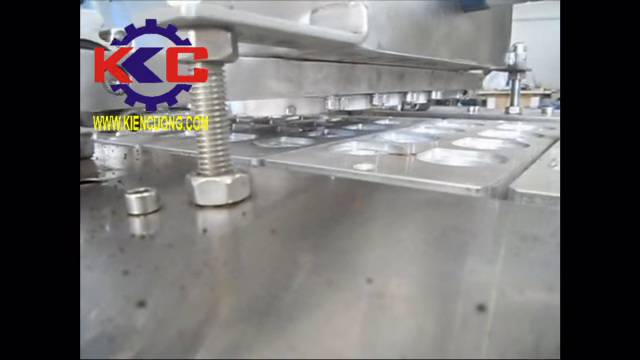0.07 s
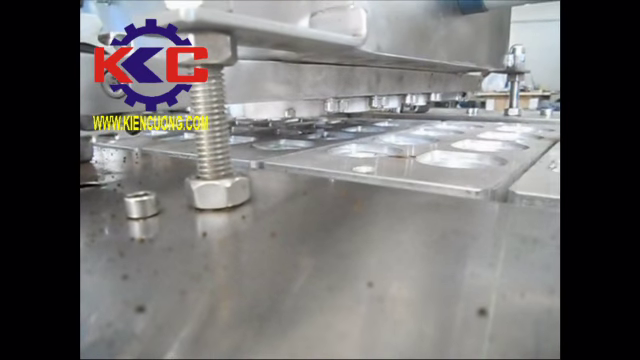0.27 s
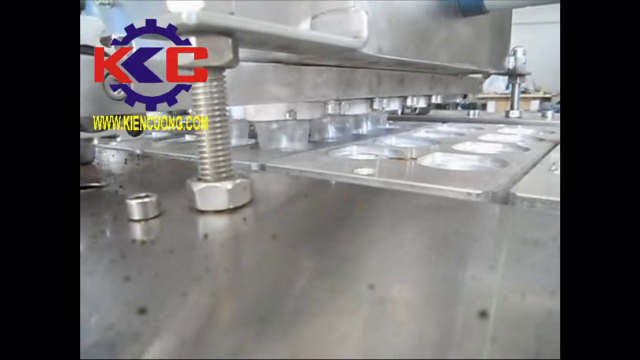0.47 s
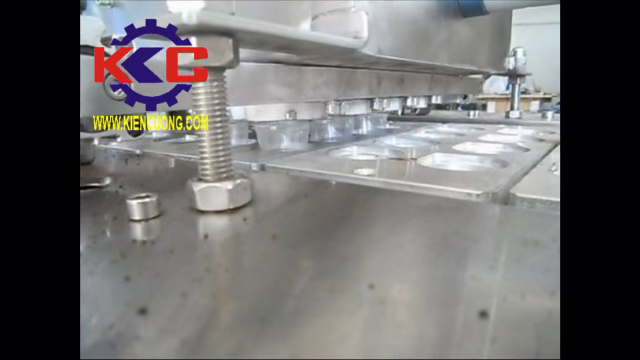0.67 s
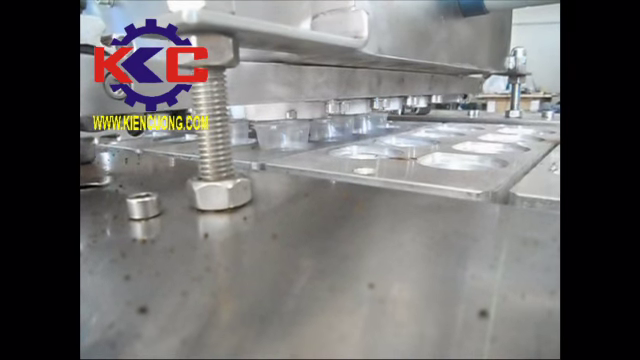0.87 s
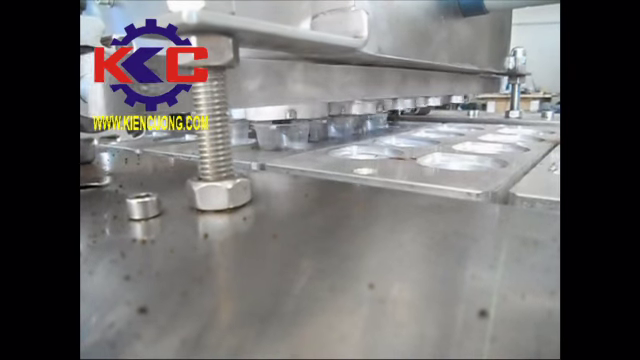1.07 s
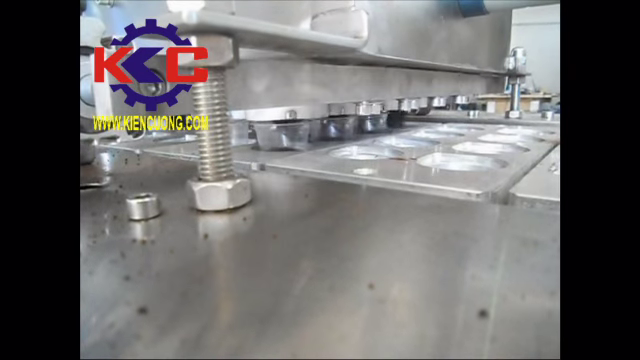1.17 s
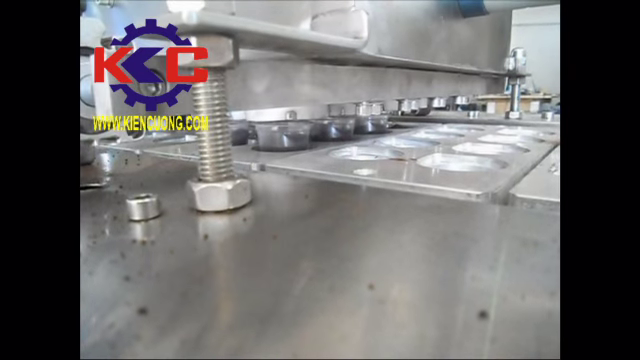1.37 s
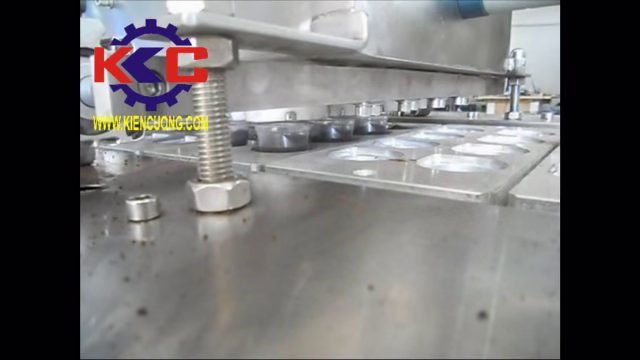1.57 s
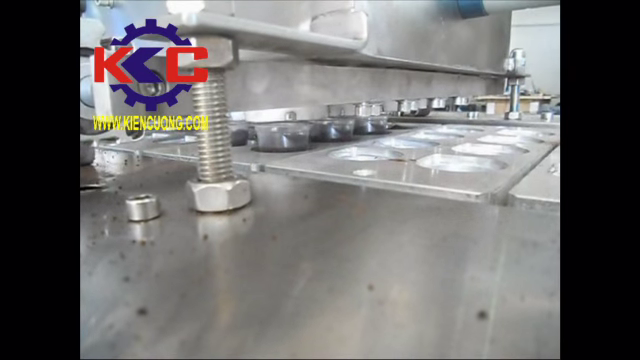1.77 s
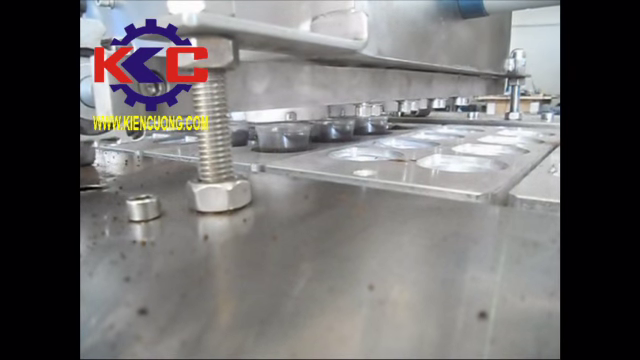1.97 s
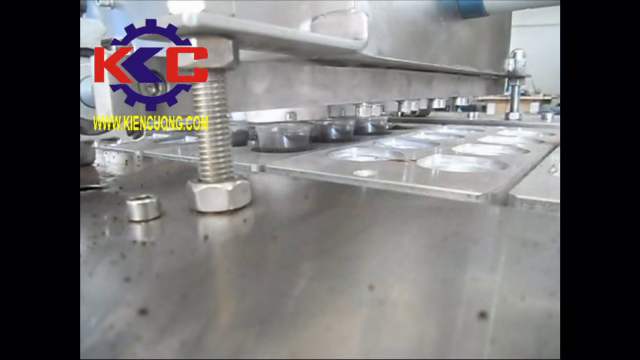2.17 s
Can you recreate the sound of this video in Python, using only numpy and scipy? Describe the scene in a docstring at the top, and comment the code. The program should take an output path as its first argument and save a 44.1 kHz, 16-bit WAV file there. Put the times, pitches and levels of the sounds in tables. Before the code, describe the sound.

A pneumatic cup filling machine cycles with air hisses, metal knocks, clicks and a clank.

```python
"""A workshop, at the steel table of a pneumatic cup filling machine that runs through one cycle.
The carriage slides with grainy friction and knocks the frame into ringing; latch pins click home.
Air rushes and whistles thinly through the cylinder, the press thuds down and a steel stop clanks.
Air valves hiss in turn over the drone of the shop."""
import sys
import numpy as np
from scipy import signal
from scipy.fft import rfft, irfft
from scipy.io import wavfile
from scipy.ndimage import uniform_filter1d

SR = 44100
rng = np.random.default_rng(int(sys.argv[2]) if len(sys.argv) > 2 else 0)


def int16_out(signal):
    """Quantize to a 16-bit WAV file."""
    q = np.round(np.clip(np.atleast_2d(signal).T, -1, 1) * 32767)
    wavfile.write(sys.argv[1], SR, q.astype(np.int16))


N = 97020
T = np.arange(N) / SR


def undb(db):
    """Decibels to gain."""
    return 10 ** (np.asarray(db) / 20)


def curve(rows, col=1):
    """One column of a time table, linearly interpolated."""
    rows = np.array(rows)
    return np.interp(T, rows[:, 0], rows[:, col])


def colour(x, points):
    """Minimum-phase filter from (f/Hz, gain/dB) points; attacks stay sharp."""
    hz, db = np.array(points).T
    bins_hz = np.arange(N + 1) * SR / (2 * N)
    gain = undb(np.interp(np.log(bins_hz + 1), np.log(hz), db))
    cepstrum = irfft(np.log(gain))
    cepstrum[1:N] *= 2
    cepstrum[N + 1:] = 0
    return irfft(rfft(x, 2 * N) * np.exp(rfft(cepstrum)))[:N]


def noise(spectrum, grain_db=0):
    """Coloured noise, rms 1; grain makes it a crowd of tiny uneven impacts."""
    size = np.minimum(rng.exponential(size=N), 4.5)
    x = colour(rng.standard_normal(N) * undb(grain_db * size), spectrum)
    return x / x.std()


def drift(rate_hz):
    """Smooth random signal, spread near 1."""
    step = max(int(SR / rate_hz), 1)
    held = rng.standard_normal(N)[np.arange(N) // step]
    return 1.3 * uniform_filter1d(uniform_filter1d(held, step), step)


def fade(t60_s):
    """Exponential decay."""
    return np.exp(-np.log(1000) * T / max(t60_s, 1e-3))


def at(x, start_s):
    """Delay x to start_s."""
    return np.concatenate([np.zeros(int(start_s * SR)), x])[:N]


def ring(modes, contact_s=0.00021):
    """Decaying modes of a struck part, built up over the contact."""
    build = 1 - np.exp(-T / contact_s)
    return build * sum((-1) ** k * undb(db) * fade(t60_s) * np.sin(2 * np.pi * hz * T)
                       for k, (hz, db, t60_s) in enumerate(modes))


def strike(blows, modes, spectrum, crack_db, crack_t60_s, room_db, room_t60_s, rattle_db=1.5):
    """A heavy part lands and bounces: unevenly rattling modes, short crack, diffuse tail."""
    body = ring(modes)
    envelope = undb(crack_db) * fade(crack_t60_s) + undb(room_db) * fade(room_t60_s)
    out = 0
    for start_s, db in blows:
        rattle = undb(rattle_db * (2 - fade(room_t60_s)) * drift(90))
        out += undb(db) * at(body * rattle + envelope * noise(spectrum), start_s)
    return out


PRESS_LANDINGS = [(1.612, -7.2), (1.618, -13), (1.632, -22)]  # landing and rebounds [t/s, level/dB]
PRESS_MODES = [(160, -17, 0.13), (223, -8.5, 0.18), (278, -10.5, 0.11), (805, -3.5, 0.065),
               (916, -8, 0.064), (1096, -12.5, 0.29), (1237, -4, 0.13)]  # resonances [f/Hz, level/dB, t60/s]
PRESS_SPECTRUM = [(70, -16), (200, 17), (420, -11.5), (950, 9), (1600, -3), (2600, -10), (4200, -22),
                  (9000, -29), (14000, -95)]  # impact noise [f/Hz, level/dB]


def press():
    """The press thuds down and rebounds twice."""
    return strike(PRESS_LANDINGS, PRESS_MODES, PRESS_SPECTRUM,
                  crack_db=-5.5, crack_t60_s=0.063, room_db=-10.5, room_t60_s=0.35)


STOP_HITS = [(1.789, -13.5), (1.7927, -33.5)]  # blow and bounce [t/s, level/dB]
STOP_MODES = [(230.6, -5, 0.16), (273, -7.5, 0.66), (318, -10.5, 0.64), (392, -10, 0.67), (723, -13.5, 0.6),
              (1277, -7, 0.25), (1470, -14.5, 0.23), (3570, -5, 0.082), (4350, -2.5, 0.07),
              (5060, -10, 0.055)]  # resonances [f/Hz, level/dB, t60/s]
STOP_SPECTRUM = [(40, -39), (280, 14.5), (600, 9), (1500, -4), (2400, -5.5), (4000, -1), (6800, -9),
                 (9000, -13), (14000, -75)]  # impact noise [f/Hz, level/dB]


def steel_stop():
    """The struck stop clanks; its low modes ring on."""
    return strike(STOP_HITS, STOP_MODES, STOP_SPECTRUM,
                  crack_db=-2, crack_t60_s=0.098, room_db=-12.5, room_t60_s=0.14)


# frame contacts from the carriage, and at 1.783 s from the stop grazing it [t/s, bass/dB, middle/dB, treble/dB,
# top/dB, resonance f/Hz, lift/dB]
FRAME_CONTACTS = [(.437, -14, -16, -21, -20, 710, 11.5), (.449, -26.5, -18, -30, -36, 590, 13.5),
                  (.461, -29, -27, -25.5, -34, 1670, 16), (.469, -10.5, -24, -32, -33, 778, 18),
                  (.481, -26, -21, -18, -25, 550, 12), (.492, -12.5, -22.5, -28, -38, 215, 7),
                  (.51, -23.5, -27.5, -36, -36, 710, 12), (0.564, -26, -14, -15, -22.5, 2070, 6.5),
                  (.57, -14.5, -17, -25.5, -24.5, 1250, 10), (.591, -45, -32, -35, -39, 1240, 9),
                  (.763, -25.5, -24, -12, -32.5, 394, 17), (0.78, -24.5, -23.5, -22.5, -41, 694, 10),
                  (.837, -30.5, -41, -30.5, -36, 162, 12), (1.783, -19, -22, -26.5, -21, 290, 14.5),
                  (1.887, -28, -34, -45, -56, 289, 17.5)]
BAND_CENTRES_HZ = [230, 850, 2400, 6000]  # bass, middle, treble, top [f/Hz]
FRAME_MODES = [(243.9, 0, 0.14), (558.6, -3.5, 0.097), (720, -8.5, 0.18), (829.6, -7, 0.17),
               (1137, -10.5, 0.23), (1281, -5, 0.16), (1720, -13, 0.15), (1921, -9.5, 0.15),
               (2930, -10.5, 0.099)]  # resonances [f/Hz, level/dB, t60/s]
SHEET_SPECTRUM = [(110, -30), (250, -0.5), (420, 0), (650, -0.5), (1100, 1.5), (3500, -3), (6000, -6.5),
                  (8500, -17), (14000, -81)]  # dense ring of the frame's sheets [f/Hz, level/dB]


def frame_knocks(sheet_t60_s=0.13, room_db=-17, room_t60_s=0.32, attack_s=0.00032, peak_oct=0.21):
    """The carriage jolts the frame and the stop grazes it; each contact weights four bands and lifts one
    resonance."""
    body = ring(FRAME_MODES)
    attack = 1 - np.exp(-T / attack_s)
    envelope = attack * (fade(sheet_t60_s) + undb(room_db) * fade(room_t60_s))
    hz = np.geomspace(40, 16000, 400)
    out = 0
    for start_s, *bands_db, peak_hz, lift_db in FRAME_CONTACTS:
        weight_db = np.interp(np.log(hz), np.log(BAND_CENTRES_HZ), bands_db)
        weight_db += lift_db / (1 + (np.log2(hz / peak_hz) / peak_oct) ** 2)
        knock = body + envelope * noise(SHEET_SPECTRUM)
        out += at(colour(knock, list(zip(hz, weight_db))), start_s)
    return colour(out, [(80, -12), (190, 0)])  # bass cut


# pin impacts [t/s, level/dB, tilt/(dB/oct), tail/dB, seat f/Hz, ping f/Hz, ping/dB]
LATCH_CLICKS = [(.952, -27, -5.5, -8, 887, 2850, 3.5), (1.1333, -21.5, 6, -7.5, 436, 2570, 6.5),
                (1.143, -15.5, 0.5, -9.5, 1650, 3450, 3), (1.1871, -18.5, 1.5, -7.5, 1060, 2510, 4),
                (1.2082, -17.5, -0.5, -11, 1220, 2460, 1.5)]
LATCH_MODES = [(746, -13, 0.24), (864, -11, .16), (1152, -5.5, 0.19), (1780, -6, 0.17)]  # resonances [f/Hz, level/dB, t60/s]
LATCH_SPECTRUM = [(100, -21), (500, -4), (1500, 8), (3000, -0.5), (4800, -14.5), (6400, -11), (8500, -21),
                  (12000, -74)]  # impact noise [f/Hz, level/dB]


def latches(crack_db=-0.5, crack_t60_s=0.065, tail_t60_s=0.19, pivot_hz=2000,
            seat_db=1, seat_t60_s=0.047, ping_t60_s=0.023):
    """Each pin pings at its own pitch and knocks its seat; a dull tail lingers in the carriage."""
    body = ring(LATCH_MODES)
    out = 0
    for start_s, db, tilt_db, tail_db, seat_hz, ping_hz, ping_db in LATCH_CLICKS:
        crack = undb(crack_db) * fade(crack_t60_s) * noise(LATCH_SPECTRUM)
        tail = undb(tail_db) * fade(tail_t60_s) * noise(CARRIAGE_SPECTRUM)
        click = colour(body + crack + tail, [(pivot_hz / 2, -tilt_db), (pivot_hz * 2, tilt_db)])
        pin = ring([(seat_hz, seat_db, seat_t60_s), (ping_hz, ping_db, ping_t60_s)])
        out += undb(db) * at(pin + click, start_s)
    return out


SLIDE_DB = [(0, -79), (.16, -35), (.21, -28.5), (.26, -20.5), (.325, -17), (.385, -25), (.47, -20.5),
            (.68, -26.5), (.88, -33), (.98, -37.5), (1.2, -66)]  # friction envelope [t/s, level/dB]
CARRIAGE_SPECTRUM = [(30, -39.5), (100, -8.5), (170, -1.5), (240, 3), (520, -2), (850, -2.5), (1500, -10),
                     (7500, -29), (14000, -103)]  # carriage body noise [f/Hz, level/dB]


def carriage(judder_db=0.73):
    """Grainy, juddering friction of the sliding carriage."""
    envelope = undb(curve(SLIDE_DB) + judder_db * drift(71.1))
    return envelope * noise(CARRIAGE_SPECTRUM, grain_db=3.0)


RUSH_DB = [(1.2, -33), (1.36, -30), (1.5, -28), (1.605, -23.5), (1.64, -33), (1.78, -25), (1.95, -36.5),
           (2.2, -44.5)]  # cylinder airflow envelope [t/s, level/dB]
RUSH_SPECTRUM = [(30, -15.5), (70, 1), (220, 5.5), (420, -1.5), (800, 6.5), (1200, 5.5), (1800, -1),
                 (5000, -14), (8500, -24), (14000, -112)]  # airflow noise [f/Hz, level/dB]
THROTTLE_TONE = [(1.3, 3180, -61), (1.45, 3108, -39.5), (1.51, 3085, -35.5), (1.6, 3090, -37),
                 (1.66, 3080, -40), (1.75, 3140, -42.5), (1.92, 3135, -48), (2.06, 2953, -44.5),
                 (2.2, 2930, -40.5)]  # whistle [t/s, f/Hz, level/dB]


def cylinder(waver=0.0137, wander=0.006, flutter_db=4, octave_db=-9):
    """Air rushes through the press cylinder and whistles raggedly in its throttle."""
    pitch_hz = curve(THROTTLE_TONE) * (1 + waver * drift(600) + wander * drift(45))
    phase = 2 * np.pi * np.cumsum(pitch_hz) / SR
    envelope = undb(curve(THROTTLE_TONE, 2) + flutter_db * drift(110))
    whistle = envelope * (np.sin(phase) + undb(octave_db) * np.sin(2 * phase))
    return whistle + undb(curve(RUSH_DB)) * noise(RUSH_SPECTRUM)


def puff(start_s, hold_s, release_s, attack_s=0.019, sag_db_per_s=25):
    """Valve flow envelope: quick rise, sag as the pressure falls, release."""
    age_s = np.maximum(T - start_s, 0)
    rise = np.minimum(age_s / attack_s, 1) ** 2
    release = np.exp(-np.maximum(age_s - hold_s, 0) / release_s)
    return rise * undb(-sag_db_per_s * age_s) * release


VALVE_OPENINGS = [(.005, 0.33, -36, -49.5), (.293, 0.14, -25, -41.5), (0.587, 0.16, -39, -81),
                  (0.901, 0.36, -36.5, -57), (1.306, 0.58, -33, -49), (1.999, .27, -37, -48)]  # air bursts [t/s, hold/s, hiss/dB, sizzle/dB]
HISS_SPECTRUM = [(300, 1.5), (3500, 2.5), (8000, -2), (9600, -4), (10800, -33), (14000, -67)]  # open-valve noise [f/Hz, level/dB]
SIZZLE_SPECTRUM = [(6000, -15), (10000, -3), (14000, 4.5)]  # full-pressure noise [f/Hz, level/dB]


def valves():
    """Each valve sizzles at full pressure, then hisses on more dully until it shuts."""
    hiss = sizzle = 0
    for start_s, hold_s, hiss_db, sizzle_db in VALVE_OPENINGS:
        hiss += undb(hiss_db) * puff(start_s, hold_s, release_s=0.04)
        sizzle += undb(sizzle_db) * puff(start_s, hold_s=0.12, release_s=0.0083)
    return hiss * noise(HISS_SPECTRUM) + sizzle * noise(SIZZLE_SPECTRUM)


SHOP_SPECTRUM = [(20, -30), (45, -2), (100, -5), (170, -5), (250, 8.5), (450, -2), (750, -3), (1150, 1),
                 (1800, -9), (3000, -8.5), (5000, -28), (8000, -32.5), (14000, -102)]  # background drone [f/Hz, level/dB]


def workshop(level_db=-35, flutter_db=3.55):
    """Continuous, faintly rattling drone of the shop."""
    return undb(level_db + flutter_db * drift(8.57)) * noise(SHOP_SPECTRUM, grain_db=4.0)


def cycle():
    """Mono sum of all sources, with fresh noise per call."""
    impacts = press() + steel_stop() + frame_knocks() + latches()
    return impacts + carriage() + cylinder() + valves() + workshop()


SIDE_GAIN_DB = [(40, -7), (160, -25), (350, -20.5), (700, -18.5), (1400, -16), (2800, -16), (5600, -7),
                (11000, -9)]  # stereo side relative to mid [f/Hz, level/dB]


def scene(scatter_t60_s=0.0077, balance_db=-0.11):
    """All parts sit ahead; unrelated reflections from nearby steel widen the treble."""
    mid = cycle()
    scatter = rng.standard_normal(N) * fade(scatter_t60_s)
    reflections = signal.fftconvolve(cycle(), scatter / np.linalg.norm(scatter))[:N]
    side = colour(reflections, SIDE_GAIN_DB)
    return np.array([(mid + side) * undb(balance_db), (mid - side) * undb(-balance_db)])


def record(dry):
    """Steep low-pass on the top treble."""
    cutoff_hz = 14500
    return signal.sosfilt(signal.ellip(8, 0.2, 70, cutoff_hz, fs=SR, output="sos"), dry)


dry = scene()
out = record(dry)
int16_out(out)
```